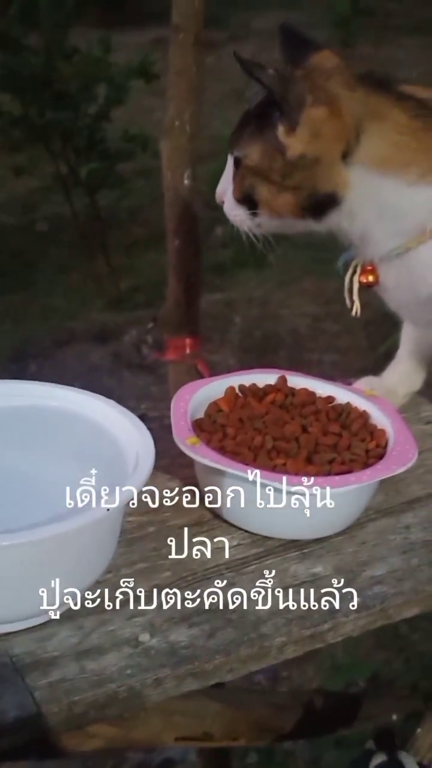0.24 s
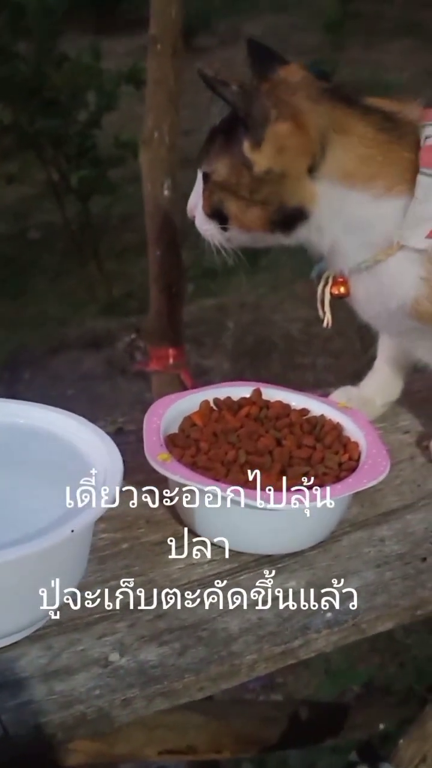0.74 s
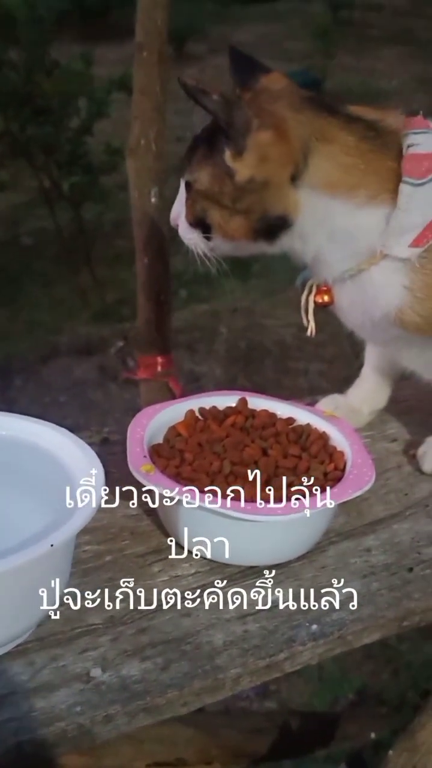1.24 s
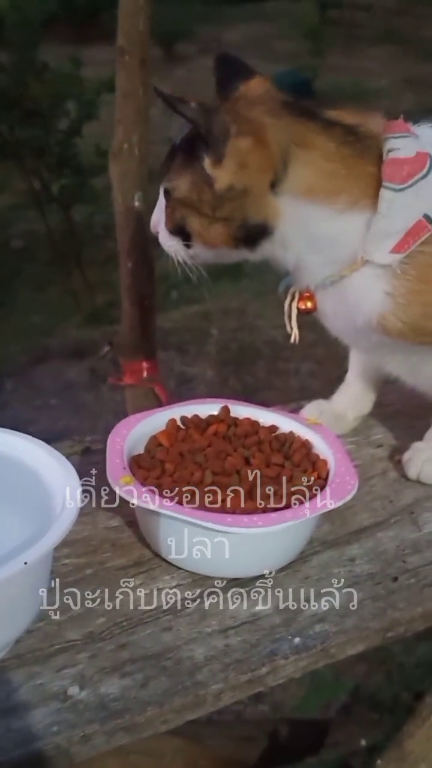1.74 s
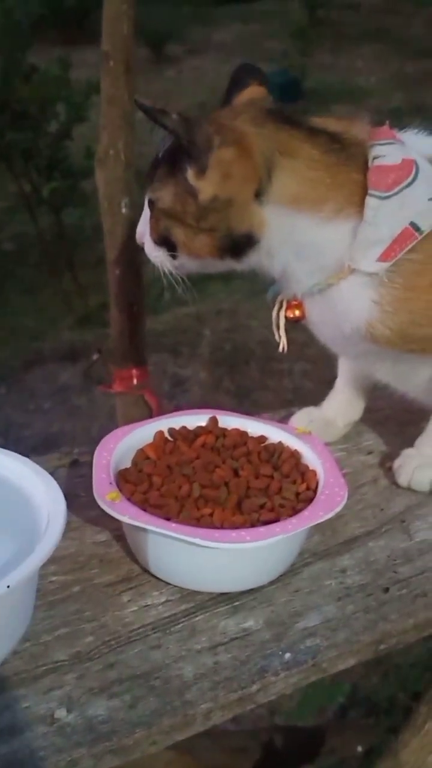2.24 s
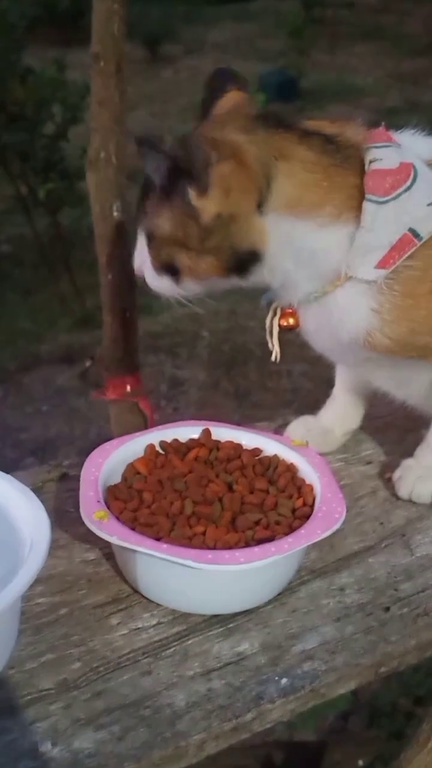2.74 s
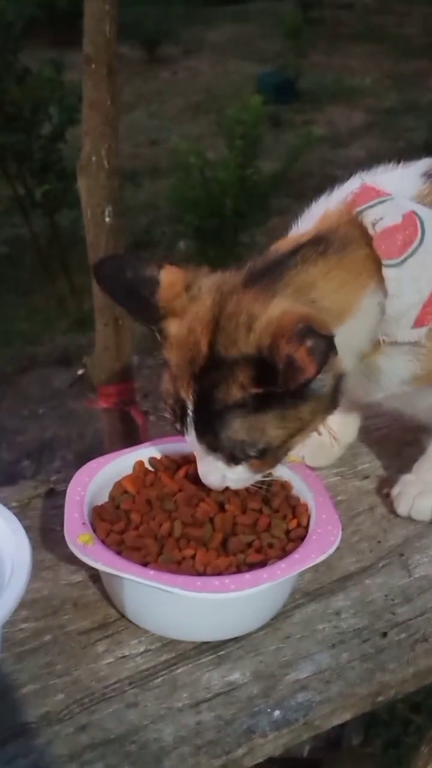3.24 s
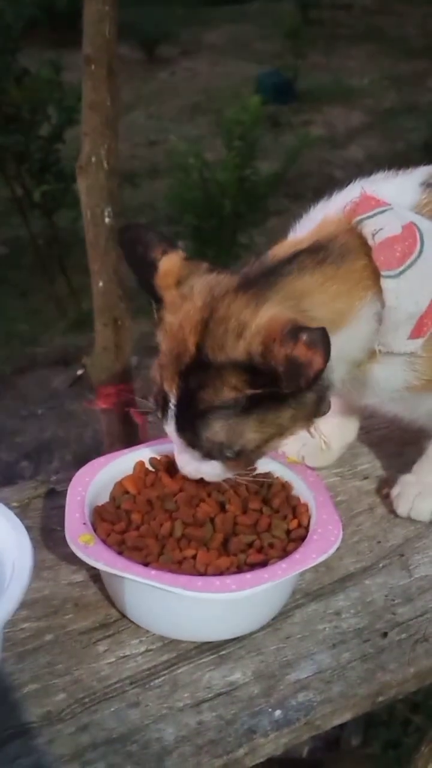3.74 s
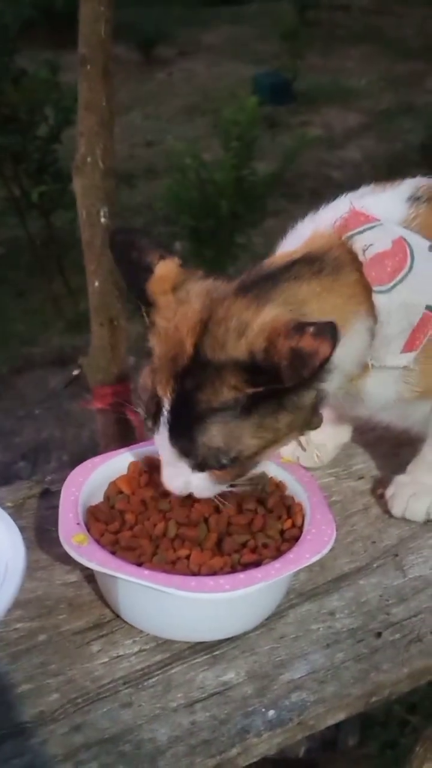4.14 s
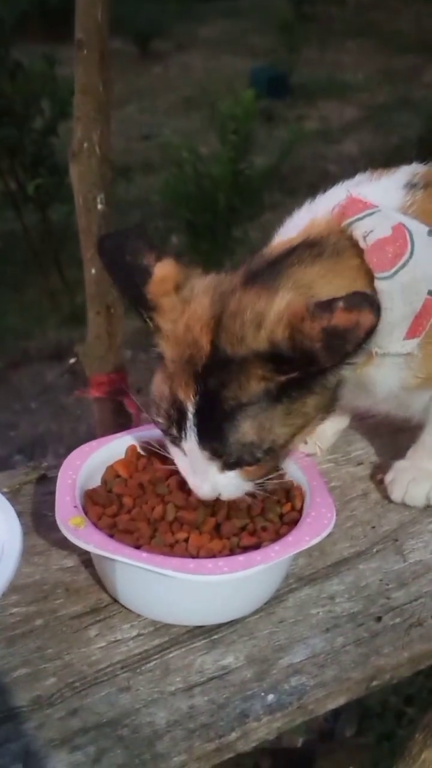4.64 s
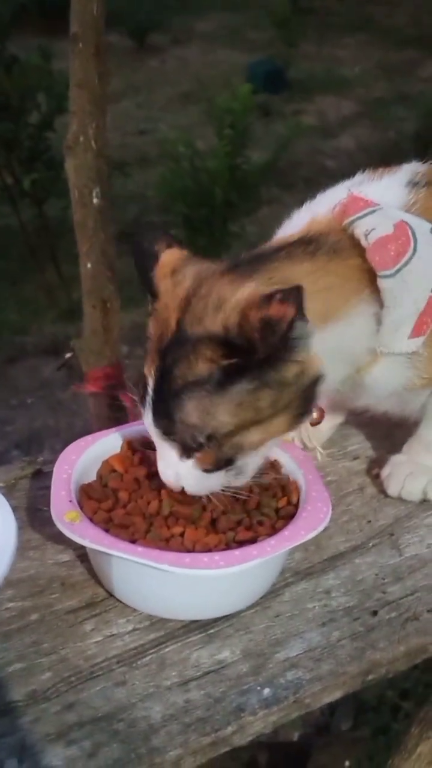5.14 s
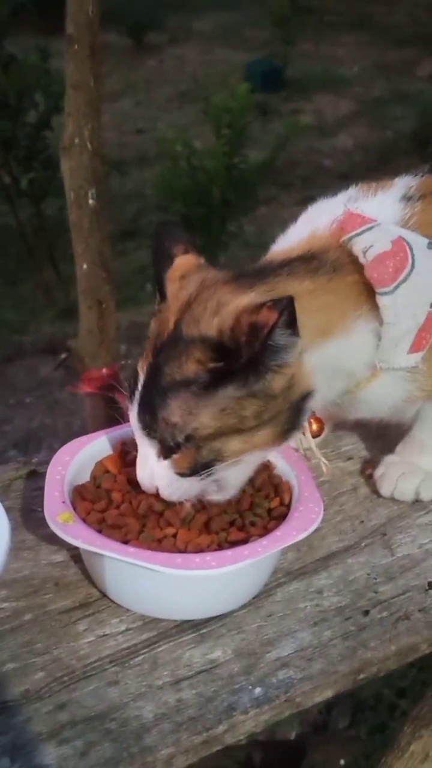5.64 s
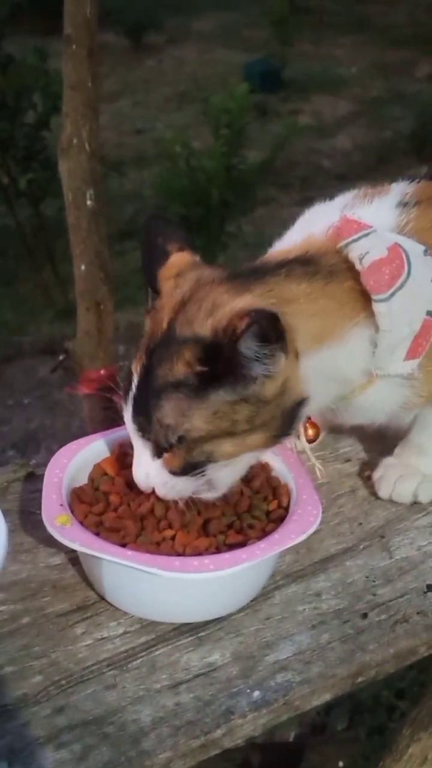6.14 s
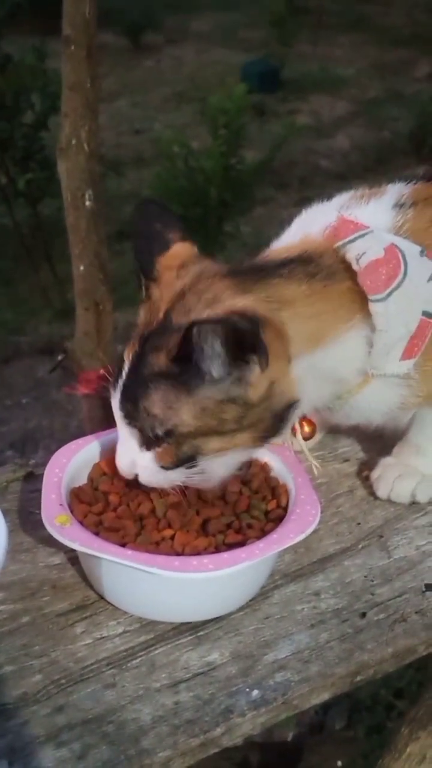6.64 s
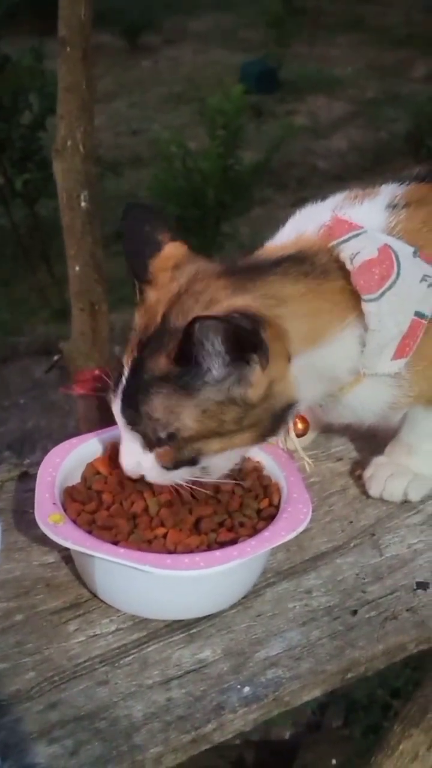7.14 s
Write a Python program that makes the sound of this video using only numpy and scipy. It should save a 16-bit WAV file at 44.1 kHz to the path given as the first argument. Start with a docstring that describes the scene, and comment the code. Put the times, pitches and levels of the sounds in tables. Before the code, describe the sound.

A rural dawn chorus of sharp downward chirps, rasping trills and far swooping calls, with thin buzzes, faint coos and a few dry clicks.

```python
"""A soft outdoor rumble and far whoops open a rural dawn; a nearer bird soon scolds in harsh, trilled chirps.
Two small birds trade falling slurs and arched notes; thin buzzes and low coos come from the trees.
A few small dry clicks fall among them, some at the onset of the near bird's slurs, one with a hollow knock.
Notes are frequency-modulated tones with scattered echoes, buzzes and floor are filtered noise, and clicks are
noise bursts with decaying modes. A noise suppressor lowers the floor in the pauses."""
import sys
import numpy as np
from scipy import signal
from scipy.fft import rfft, irfft, next_fast_len
from scipy.io import wavfile
from scipy.ndimage import uniform_filter1d, map_coordinates

SR = 44100
rng = np.random.default_rng(int(sys.argv[2]) if len(sys.argv) > 2 else 0)


def generate_wav(sig):
    """Save sig (samples, or channels by samples) to the path in sys.argv[1] as 16-bit PCM at SR."""
    pcm = np.round(np.clip(np.atleast_2d(sig).T, -1, 1) * 32767).astype(np.int16)
    wavfile.write(sys.argv[1], SR, pcm)


N = 326319
TIME = np.arange(N) / SR

# Contour of an arched note: time_s, pitch_hz, level_db (before each note's own ratios and level)
ARCH = [(0, 3770, -17.5), (.011, 4430, 6.5), (.019, 4820, -5), (.026, 5200, -1.5), (.038, 5030, 0),
        (.052, 4584, 4.5), (.062, 4160, -1), (.07, 4060, -60)]
# Where the slurring and arching birds sit: left_ear_lag_ms, left_over_right_db, near_echo_db
PERCHES = {"near": (0.26, -0.55, -1), "far": (0.041, 2.9, 3.03)}
# Spectral shape of hissing air: frequency_hz, relative_density_db
HISS = [(1200, -60), (3000, -28), (6000, -2.5), (7800, 6.5), (10000, -4), (12500, 1.5), (15500, -13)]


def amp(db):
    """Level definition: decibels to an amplitude ratio."""
    return 10 ** (np.asarray(db) / 20)


def unit(x):
    """Normalization: scale to rms 1."""
    return x / np.sqrt(np.mean(x ** 2) + 1e-20)


def add(track, s, sound):
    """Superposition: mix a stereo sound into the track at time s."""
    start = round(s * SR)
    first, last = max(start, 0), min(start + sound.shape[1], N)
    if last > first:
        track[:, first:last] += sound[:, first - start:last - start]


def wobble(size, rate):
    """Band-limited fluctuation: a smooth random curve through rate knots a second."""
    knots = rng.standard_normal(int(size * rate / SR) + 4)
    return map_coordinates(knots, [np.arange(size) * rate / SR])


def filtered(x, response):
    """Linear filtering: multiply the spectrum of x by a response of frequency."""
    size = x.shape[-1]
    padded = next_fast_len(size + SR // 10)
    spectrum = rfft(x, padded) * response(np.fft.rfftfreq(padded, 1 / SR))
    return irfft(spectrum, padded)[..., :size]


def swell(s, rise, fall, hold=0):
    """Exponential envelope: climbs to 1 at time s, holds and sinks; rise and fall each cover 20 dB."""
    before, after = (s - TIME) / rise, (TIME - s - hold) / fall
    return amp(-20 * np.maximum(0, np.maximum(before, after)))


def noise(spectrum, side_db, patchy_db):
    """Spectral shaping: coloured mid-side stereo noise of rms 1, patchy in time and frequency."""
    white = signal.stft(rng.standard_normal((2, N)), nperseg=512)[2]
    across_frequency = uniform_filter1d(rng.standard_normal(white.shape[1:]), size=5, axis=0)
    patches = unit(uniform_filter1d(across_frequency, size=12, axis=1))
    pair = signal.istft(white * amp(patchy_db * patches), nperseg=512)[1][:, :N]
    f, db = np.transpose(spectrum)
    mid, side = filtered(pair, lambda hz: amp(np.interp(np.log(hz + 1), np.log(f), db)))
    return unit(np.array([mid + amp(side_db) * side, mid - amp(side_db) * side]))


def whistle(shape, pitch, length, rough, flutter_hz, overtone_db, trill=False):
    """Frequency modulation: a gliding tone with random flutter; a fast trill cuts it into strokes."""
    trill_hz, trill_pitch_share, trill_depth = 290, .025, .65
    s, hz, db = np.transpose(shape)
    s = np.sort(s - s[0]) * length
    t = np.arange(int(s[-1] * SR)) / SR
    stroke = 2 * np.pi * trill_hz * t + 1.4 * wobble(len(t), 207.8)
    glide = uniform_filter1d(np.interp(t, s, hz), size=200) * pitch
    glide = glide * (1 + trill_pitch_share * trill * np.sin(stroke))
    fluttering = glide * (1 + rough * wobble(len(t), flutter_hz))
    phase = 2 * np.pi * np.cumsum(fluttering) / SR  # phase is the integral of frequency
    tone = np.sin(phase) + amp(overtone_db) * (np.sin(2 * phase) + .5 * np.sin(3 * phase))
    loudness = amp(np.interp(t, s, db)) * (1 - trill_depth * trill * np.cos(stroke))
    return np.sqrt(2) * tone * loudness * signal.windows.tukey(len(t), .06)


def echo_tail(t, t60, hits):
    """Reverberant decay: random reflections fall 60 dB in t60 seconds, after a soft onset."""
    onset = 1 - np.exp(-t / 0.00069)
    tail = hits * rng.standard_normal((2, len(t))) * amp(-60 * t / t60) * onset
    return unit(tail) / np.sqrt(len(t))  # total energy near 1 over both ears' mean


def outdoors(x, lag_ms, pan_db, near_db, near_t60, far_db, far_t60):
    """Interaural delay and scattering: the left ear lags, walls return single echoes, trees ring on."""
    wall_echoes_per_s = 500
    t = np.arange(SR * 3 // 4) / SR
    walls = rng.random((2, len(t))) < wall_echoes_per_s / SR
    tail = amp(near_db) * echo_tail(t, near_t60, walls) + amp(far_db) * echo_tail(t, far_t60, 1)
    echoes = signal.fftconvolve(x[None], tail, axes=1)
    # a linear phase is a delay; each ear takes half of the lag
    direct = filtered(x, lambda hz: np.exp(1j * np.pi * np.outer([-1, 1], hz) * lag_ms / 1000))
    direct = np.pad(direct, ((0, 0), (0, len(t) - 1)))
    return (direct + echoes) * amp([[pan_db / 2], [-pan_db / 2]])


def background():
    """Broadband noise floor: a low rumble with soft bumps in it, soft air and a fine hiss."""
    # Spectral shapes of rumble, bumps and air: frequency_hz, relative_density_db
    rumble_spectrum = [(15, -61), (25, -34), (87, -4.5), (105, -7), (151, -13.5), (243, -20), (279, -18.5),
                       (373, -21.5), (400, -22.5), (520, -28), (880, -120)]
    bump_spectrum = [(20, -44), (45, -17.5), (65, -5), (90, 1.5), (115, -11), (160, -25), (300, -50.5)]
    air_spectrum = [(120, -3.5), (220, -2), (400, -1.5), (700, -2), (1400, -8.5), (2000, -4), (3200, -11.5),
                    (4600, -1), (6000, -16.5), (9000, -20), (12000, -18)]
    # Soft low bumps: start_s, hold_s, level_db (before the common bump gain)
    bump_times = [(0.02, 0.072, -60), (0.4, 0.11, -54), (0.621, 0.041, -55.5), (0.75, 0.068, -54.5),
                  (1.039, 0.088, -55.5), (1.222, 0.03, -48), (1.469, 0.15, -56.5), (1.958, 0.23, -55.5),
                  (2.685, 0.21, -57), (3.328, 0.04, -58.5), (3.99, 0.062, -52.5), (4.398, 0.19, -59.5),
                  (5.82, 0.052, -54.5), (6.53, 0.15, -58)]
    rumble_db, air_db, hiss_db = -71, -72.5, -81
    bump_gain_db, bump_edge_s = -5, .035
    rumble = amp(rumble_db + 1.6 * wobble(N, 14)) * noise(rumble_spectrum, side_db=-16, patchy_db=1.0)
    bumping = sum(amp(db + bump_gain_db) * swell(s, bump_edge_s, bump_edge_s, hold=length)
                  for s, length, db in bump_times)
    bumps = bumping * noise(bump_spectrum, side_db=-19.5, patchy_db=3.0)
    air = amp(air_db) * noise(air_spectrum, side_db=-2.0, patchy_db=4.5)
    hiss = amp(hiss_db + 1.9 * wobble(N, 2.8)) * noise(HISS, side_db=0.0, patchy_db=11.0)
    return rumble + bumps + air + hiss


def far_whoops():
    """Pitch glide: distant callers hold a low tone, swoop up and fall; stress leans on crest or fall."""
    # Contour of a whoop: time_from_crest_s, pitch_hz, level_db (before each call's ratios and stress)
    contour = [(-.36, 1400, -30.5), (-.31, 1330, -6.5), (-.21, 1265, -6.5), (-.14, 1360, -7.5),
               (-.07, 1480, -2), (0, 1574, 1.5), (.05, 1484, -6), (0.101, 1244, -6.5), (0.151, 1060, -19.5),
               (0.181, 1050, -37)]
    # Calls: crest_s, level_db, pitch_ratio, run_up_length_ratio, crest_stress_db, fall_stress_db
    calls = [(-.08, -66.5, 0.85, 1.1, -12, 7), (.41, -58, 1.14, 1.1, -15, -1), (.52, -48, 1, 0.92, -3.5, 1),
             (1.26, -55, .955, 1.42, -14, -2), (1.661, -60.5, 1.17, 0.88, -9, 1),
             (1.7, -55.5, 0.89, 0.8, 1, -7), (1.94, -49, 1.014, 1.05, -1.5, -0.5),
             (2.69, -72.5, 0.98, 1.08, -1, 12), (2.988, -53.5, 0.98, 1.11, -12.5, -2.5),
             (3.341, -49.5, 1.04, 0.96, 1, -1), (4.191, -63.5, 1.065, 0.92, -15.5, 6),
             (4.63, -57, 1.085, 0.77, -3, -13), (4.7, -47.5, 1.045, 1.04, -1.5, -10),
             (4.94, -60.5, 1, 1, -4, 10.5), (5.622, -54.5, .985, 1.4, -9, -5),
             (6.02, -54.5, 1.127, 0.92, -3, -8), (6.039, -49, 1.015, 0.83, 0, -15.5),
             (6.349, -67, 1, 1, -1, 10.5), (6.98, -58.5, 1.1, 1.004, -9, -8),
             (7.68, -53, 1.084, 1.03, -14, 0)]
    out = np.zeros((2, N))
    when, hz, shape_db = np.transpose(contour)
    crest = np.clip((hz - np.median(hz)) / (hz.max() - np.median(hz)), 0, 1)
    fall = np.clip(2 * when / when[-1], 0, 1)
    for s, db, pitch, run_up, crest_db, fall_db in calls:
        times = np.where(when < 0, when * run_up, when)
        stressed_db = shape_db + crest_db * crest + fall_db * fall
        note = whistle(np.transpose([times, hz, stressed_db]), pitch, 1,
                       rough=.003, flutter_hz=90.8, overtone_db=-40)
        heard = outdoors(note, 0.36, -0.46, near_db=-4, near_t60=0.13, far_db=-5, far_t60=0.76)
        add(out, s + times[0], amp(db) * heard)
    return out


def scolding_bird():
    """Fast modulation: trilled chirps with a thin lisp and a rasp of air; softer ones are farther and wetter."""
    # Contour of a chirp: time_s, pitch_hz, level_db (before each chirp's own ratios and level)
    chirp_contour = [(0, 3460, -12), (.005, 3660, -0.5), (.015, 4500, 3), (.027, 4220, 4),
                     (.032, 3460, -2.5), (.041, 3380, -2), (.056, 3240, -3), (.075, 2880, -5.5)]
    # Lisp leading into a chirp: time_from_chirp_s, pitch_hz, level_re_chirp_db (times before a 0.99 ratio)
    lisp_contour = [(-.025, 7580, -46), (-.018, 7270, -21), (-.004, 5880, -12), (.006, 5900, -42)]
    # Chirps: start_s, level_db, pitch_ratio, length_ratio, pitch_roughness_share
    chirps = [(-.02, -61, 1.12, 1.7, 0.127), (0.368, -52.5, 1.005, 0.68, 0.093),
              (0.955, -57.5, 0.96, 0.73, 0.049), (1.622, -38, .99, 0.81, 0.036),
              (2.74, -38.5, 0.99, 0.91, 0.028), (3.319, -53, 1.066, 0.78, 0.11),
              (3.852, -39.5, 0.97, 0.93, 0.11), (3.912, -34, 1.01, 0.85, 0.011),
              (4.201, -60, 0.78, 0.84, 0.056), (5.453, -48.5, 1.106, 0.69, 0.092),
              (5.641, -38.5, .98, 0.83, 0.027), (6.121, -40.5, .93, .75, 0.019),
              (6.693, -58, 0.88, 1, 0.071), (6.863, -38.5, .99, 0.91, 0.028)]
    base_echo_db, close_db, wetter_per_db = -5, -38, .35
    rasp_db, rasp_crest_s = -16.5, 0.01
    rasp_rise_s, rasp_fall_s = 0.03, 0.061  # each over 20 dB
    out, rasp = np.zeros((2, N)), np.zeros(N)
    for s, db, pitch, length, rough in chirps:
        chirp = whistle(chirp_contour, pitch, length, rough, flutter_hz=1089.0, overtone_db=-33, trill=True)
        lisp = whistle(lisp_contour, 1, 0.99, rough=0.07, flutter_hz=2040, overtone_db=-38)
        echo_db = base_echo_db + wetter_per_db * (close_db - db)
        for lead, note in ((chirp_contour[0][0], chirp), (lisp_contour[0][0], lisp)):
            heard = outdoors(note, .066, 2.2, near_db=echo_db, near_t60=0.13,
                             far_db=echo_db - 10, far_t60=0.33)
            add(out, s + lead, amp(db) * heard)
        rasp += amp(db + rasp_db) * swell(s + rasp_crest_s, rasp_rise_s, rasp_fall_s)
    return out + rasp * noise(HISS, side_db=-1, patchy_db=5.5)


def far_haze(count=40):
    """Diffuse field: a faint random haze of short arched tones, mostly heard as echo."""
    out = np.zeros((2, N))
    for when, size, height, length in rng.random((count, 4)):
        note = whistle(ARCH, .6 + .5 * height, 1.2 + length, rough=0.017, flutter_hz=191.0, overtone_db=-49)
        heard = outdoors(note, 0, 1, near_db=8, near_t60=.3, far_db=4, far_t60=.6)
        add(out, when * N / SR, amp(-88 + 6 * size) * heard)
    return out


def thin_notes():
    """Tones and band noise: tiny birds give high, thin whistles and hissing buzzes that swell and fade."""
    # Contour of a thin note: time_s, pitch_hz, level_db (before each note's own ratios and level)
    contour = [(-.02, 7370, -7), (0, 7420, 9.5), (.025, 7400, -3), (.05, 7560, -3.5), (.08, 6800, -16)]
    # Thin notes: contour_zero_s, level_db, pitch_ratio, length_ratio, left_over_right_db
    notes = [(0.192, -62, 1, 0.45, -8), (0.274, -69.5, .85, 0.32, 9), (1.455, -62, 0.99, 0.54, -5),
             (2.059, -81, 1, .8, -13), (2.386, -74.5, .98, 1.2, -3.5), (3.852, -62, 0.68, 0.41, 8),
             (4.51, -78, 0.99, 0.94, -18), (5.811, -67, 1, 0.38, -12.5), (6.901, -60, 0.88, 1.47, 4)]
    # Buzzes: crest_s, level_db, rise_s, fall_s (rise and fall each over 20 dB)
    buzzes = [(.19, -52.5, 0.15, 0.07), (1.459, -56.5, 0.1, 0.094), (1.81, -65, 0.043, 0.037),
              (2.1, -61.5, 0.057, 0.068), (3.7, -55, 0.12, 0.11), (5.789, -56.5, 0.14, 0.16),
              (6.39, -68, 0.013, 0.074)]
    # Spectral shape of a buzz: frequency_hz, relative_density_db
    buzz_spectrum = [(4500, -14), (6200, -5), (7600, 8.5), (8500, -0.5), (10000, -6), (12500, -10),
                     (15500, -10)]
    out = np.zeros((2, N))
    for s, db, pitch, length, pan_db in notes:
        note = whistle(contour, pitch, length, rough=0.04, flutter_hz=2205, overtone_db=-64)
        heard = outdoors(note, 0.029, pan_db, near_db=1, near_t60=0.14, far_db=-6, far_t60=.5)
        add(out, s + contour[0][0] * length, amp(db) * heard)
    buzzing = sum(amp(db) * swell(s, rise, fall) for s, db, rise, fall in buzzes)
    return out + buzzing * noise(buzz_spectrum, side_db=0, patchy_db=5.5) * amp([[-2.5], [1.5]])


def plain_notes(notes, rough, echo_db):
    """Near-steady tones: almost level notes from far off, all at 0.97 of table pitch and 0.87 of length."""
    out = np.zeros((2, N))
    for s, length, hz, db, rise in notes:
        shape = [(0, hz, -14), (length / 4, hz, 0), (length * 3 / 4, hz * rise, 0), (length, hz * rise, -10)]
        note = whistle(shape, 0.97, 0.87, rough, flutter_hz=58.8, overtone_db=-46)
        heard = outdoors(note, 0.23, -2.4, near_db=echo_db, near_t60=0.66,
                         far_db=echo_db + 2, far_t60=0.38)
        add(out, s, amp(db) * heard)
    return out


def low_coos():
    """Low-frequency tones: soft, almost level coos."""
    # Coos, pitch and length before the plain-note ratios: start_s, length_s, pitch_hz, level_db, rise_ratio
    coos = [(.15, 0.284, 594, -80.5, 1.02), (2.525, 0.18, 603, -79, 1.05), (2.707, 0.54, 339.6, -63, 1),
            (3.302, .47, 339.8, -79, 1.07), (4.4, 0.112, 382.2, -71, 1.1), (5.48, 0.19, 374.6, -70, 1.04)]
    return plain_notes(coos, rough=0.033, echo_db=-10)


def arching_bird():
    """Pitch contour: a clear note rises and sinks, about once a second, from the near perch."""
    # Arched notes: start_s, level_db, pitch_ratio
    notes = [(0.193, -45.5, 1.01), (1.305, -49, 1.01), (2.336, -48.5, 1.012), (3.534, -47.5, 1.012),
             (4.646, -47.5, .99), (5.68, -48, 1.02), (6.716, -47, 0.99)]
    out = np.zeros((2, N))
    lag_ms, pan_db, echo_db = PERCHES["near"]
    for s, db, pitch in notes:
        note = whistle(ARCH, pitch, 0.97, rough=0.0053, flutter_hz=492.0, overtone_db=-46)
        heard = outdoors(note, lag_ms, pan_db, near_db=echo_db, near_t60=0.32, far_db=-10, far_t60=0.99)
        add(out, s, amp(db) * heard)
    return out


def slurring_birds():
    """Downward glide: two birds trade notes that slide up to a crest, then fall almost an octave."""
    # Contour of a slur: time_s, pitch_hz, level_db (before each note's own level)
    contour = [(-.007, 5711, -6.5), (.002, 5744, -6.5), (.012, 5000, -4.5), (.024, 4390, -3),
               (.04, 3817, -11), (.059, 3300, -18), (.08, 3160, -27.5)]
    # Slurs: contour_zero_s, level_db, upward_lead_in_s, perch
    notes = [(0.445, -50, .024, "far"), (0.691, -40.5, .011, "near"), (1.022, -50.5, .031, "far"),
             (1.547, -48, .058, "far"), (1.796, -39, .008, "near"), (2.102, -48, .017, "far"),
             (2.662, -46.5, .02, "far"), (2.938, -39, .006, "near"), (3.223, -46.5, .013, "far"),
             (3.727, -47.5, .041, "far"), (4.089, -39.5, .006, "near"), (4.25, -47, .021, "far"),
             (4.803, -45.5, .03, "far"), (5.207, -41, .004, "near"), (5.408, -45.5, .025, "far"),
             (5.951, -46.5, .04, "far"), (6.124, -36.5, 0.0072, "near"), (6.507, -48, .017, "far"),
             (7.048, -49, .058, "far"), (7.225, -40, .005, "near")]
    out = np.zeros((2, N))
    for s, db, lead, perch in notes:
        lag_ms, pan_db, echo_db = PERCHES[perch]
        onset = contour[0][0] - abs(lead)
        note = whistle([(onset, 4700, -18)] + contour, 1, 1, rough=0.005, flutter_hz=496.5, overtone_db=-42)
        heard = outdoors(note, lag_ms, pan_db, near_db=echo_db, near_t60=0.2,
                         far_db=echo_db - 7, far_t60=0.64)
        add(out, s + onset, amp(db) * heard)
    return out


def dry_clicks():
    """Impulsive noise and modal decay: small dry ticks, one with a clear hollow knock."""
    # Clicks, some at the onset of the near bird's slurs: start_s, tick_db, hollow_knock_db
    clicks = [(2.921, -51.5, -92), (3.701, -43, -90), (4.079, -44.5, -90), (5.211, -44, -78),
              (7.001, -48, -102), (7.014, -45.5, -100), (7.108, -42.5, -46.5), (7.163, -52.5, -94)]
    # Modes of the hollow knock: frequency_hz, level_db, t60_s
    modes = [(983, 0.5, 0.032), (1380, -5, 0.012), (1760, -6.5, 0.02)]
    out, t = np.zeros((2, N)), np.arange(SR // 10) / SR
    for s, tick_db, knock_db in clicks:
        bright_noise = np.diff(rng.standard_normal(len(t) + 1)) / 2  # differencing favours the treble
        tick = bright_noise * amp(-60 * t / 0.035)
        knock = sum(amp(db - 60 * t / t60) * np.sin(2 * np.pi * hz * t) for hz, db, t60 in modes)
        click = amp(tick_db) * tick + amp(knock_db) * knock
        add(out, s, outdoors(click, 0.029, 1.1, near_db=-4, near_t60=0.17, far_db=-23, far_t60=0.1))
    return out


def level_peeps():
    """Near-steady tones: short, almost level peeps."""
    # Peeps, pitch and length before the plain-note ratios: start_s, length_s, pitch_hz, level_db, rise_ratio
    peeps = [(3.155, 0.04, 3367, -60, 1.03), (3.468, 0.094, 3120, -52.5, 0.99),
             (4.41, 0.106, 3460, -73, .97), (5.52, 0.042, 3323, -55, 1.02)]
    return plain_notes(peeps, rough=0.024, echo_db=-11)


def scene():
    """Superposition: near and far notes, the haze, the clicks and the floor."""
    near = scolding_bird() + thin_notes() + arching_bird() + slurring_birds()
    far = far_whoops() + far_haze() + low_coos() + level_peeps()
    return background() + near + far + dry_clicks()


def record(dry):
    """Downward expansion: a noise suppressor turns all down when the birds pause; a band limit cuts the top."""
    threshold_db, cut_db_per_db, deepest_cut_db, averaging_s = -55.5, 1.24, 7.5, 0.027
    top_hz = 15850
    birds = filtered(dry, lambda hz: hz > 1000)
    power = uniform_filter1d(np.mean(birds ** 2, axis=0), size=max(1, int(averaging_s * SR)))
    under_db = threshold_db - 10 * np.log10(np.abs(power) + 1e-20)
    gain = amp(-np.clip(cut_db_per_db * under_db, 0, deepest_cut_db))
    return filtered(dry * gain, lambda hz: hz < top_hz)


dry = scene()
out = record(dry)
generate_wav(out)
```